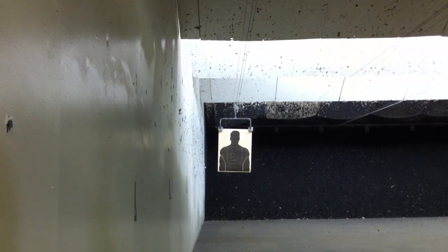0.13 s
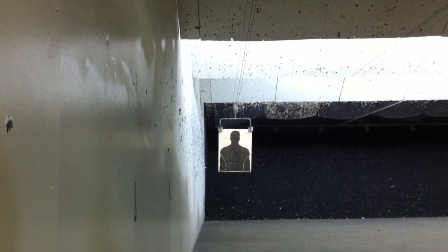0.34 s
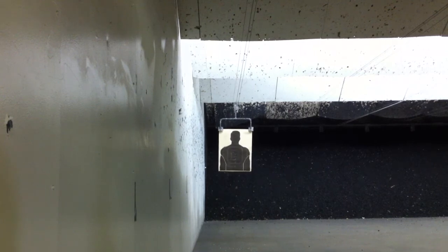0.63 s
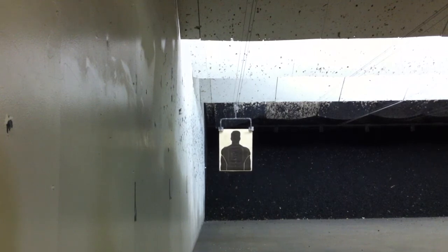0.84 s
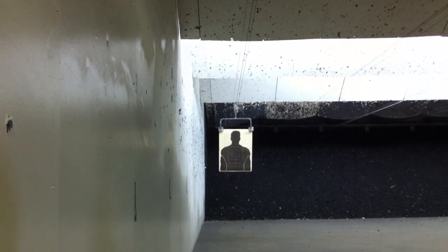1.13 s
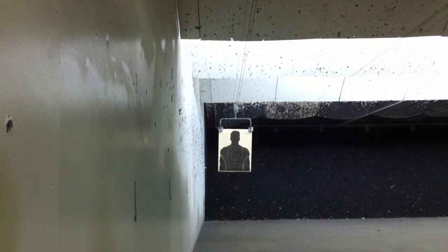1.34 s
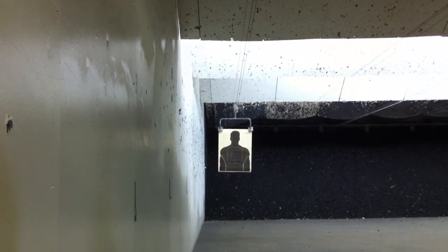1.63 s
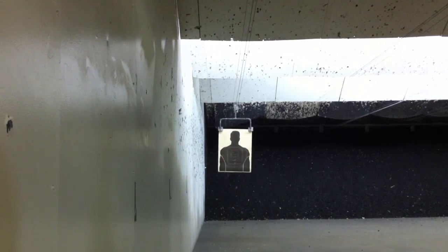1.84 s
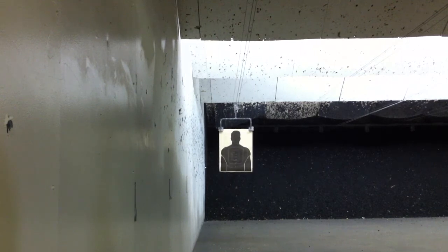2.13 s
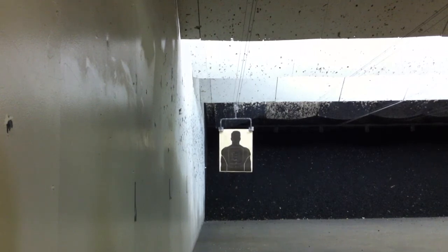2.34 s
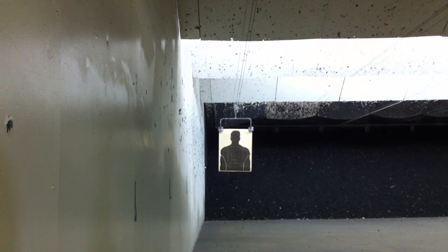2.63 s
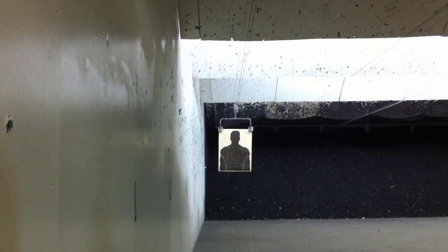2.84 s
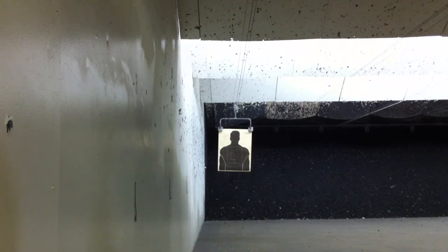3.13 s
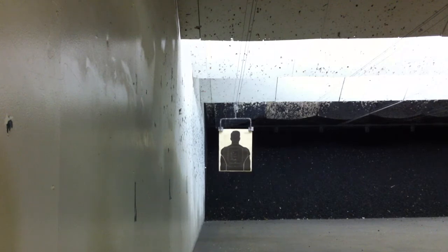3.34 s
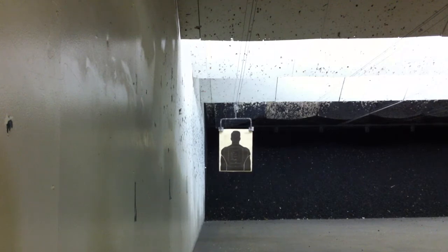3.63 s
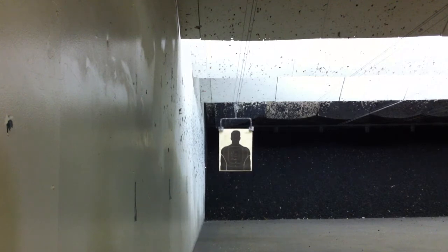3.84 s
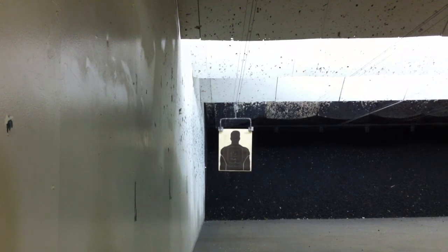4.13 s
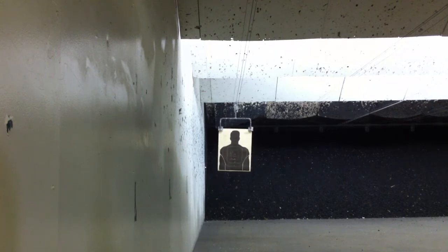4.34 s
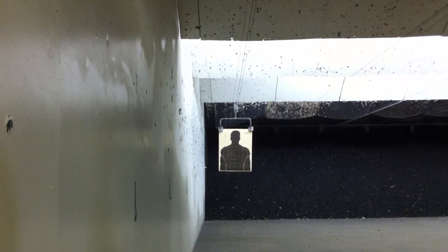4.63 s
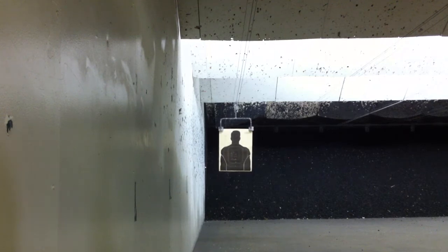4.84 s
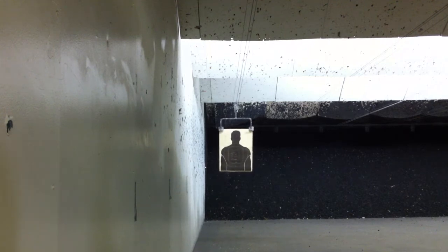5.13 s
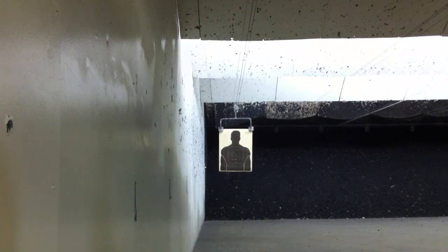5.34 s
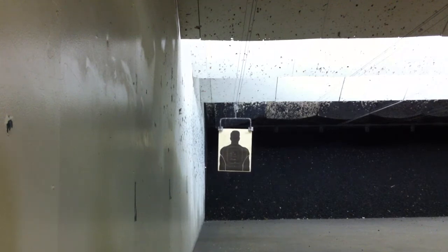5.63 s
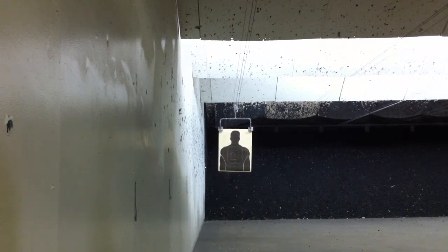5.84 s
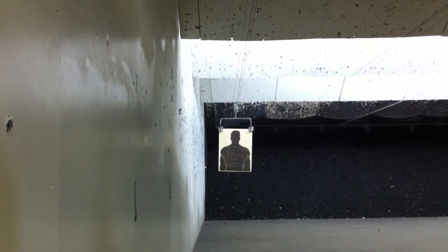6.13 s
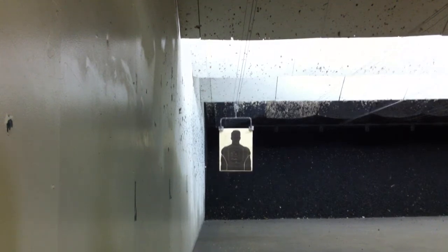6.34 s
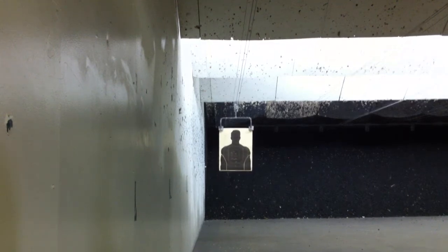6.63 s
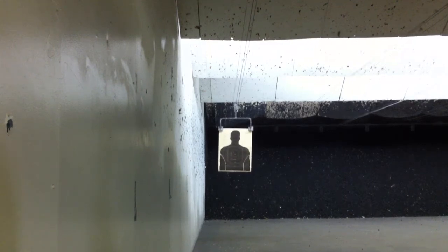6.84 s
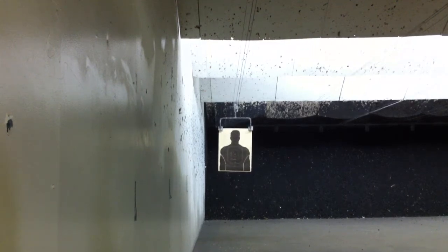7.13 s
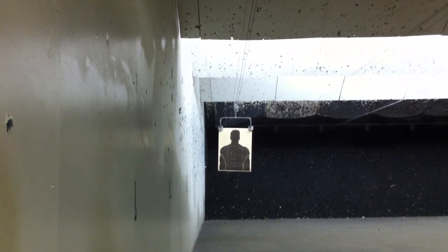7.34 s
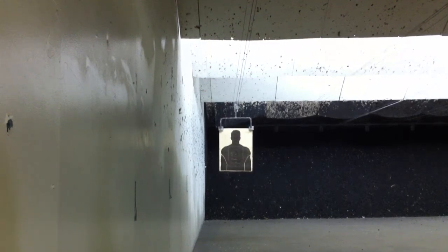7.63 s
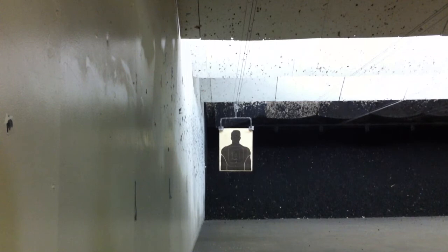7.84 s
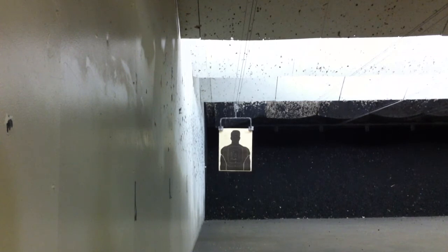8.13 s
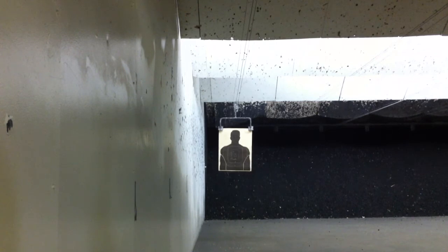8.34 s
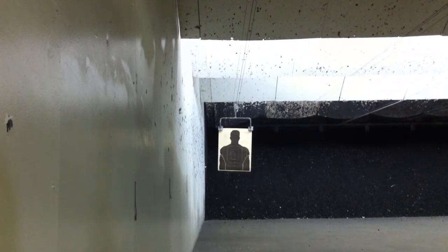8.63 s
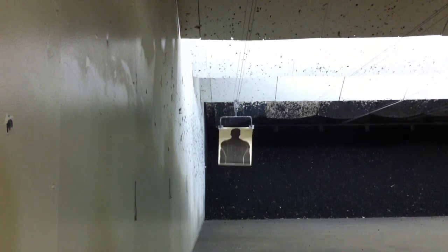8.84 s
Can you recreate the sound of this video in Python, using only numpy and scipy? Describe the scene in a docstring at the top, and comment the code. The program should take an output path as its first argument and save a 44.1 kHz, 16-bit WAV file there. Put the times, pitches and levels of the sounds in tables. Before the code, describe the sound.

A concrete indoor shooting range is heard from the shooter's booth, with a faint ventilation hum throughout. The echo of an earlier shot is dying away at the start. Three very loud pistol shots come at about 0.3, 2 and 3.8 seconds, each overloading the microphone and ringing down the long hall for about two seconds. Spent brass cases bounce and ping on the floor between and after the shots, with a sharp clack near 3.4 seconds, and roll with a thin high ring until about 7 seconds. A sleeve swishes softly around 3.5 and 5.5 seconds, and light ticks follow. From 6.3 to 6.8 seconds the pistol is put down on the bench with close knocks and a metal rattle. A dull thud sounds far off at 7.9 seconds. At 8.6 seconds a switch clicks and the target carrier motor starts with a growing whirr.

```python
"""A concrete indoor range, the microphone in the shooter's booth. Slow pistol shots overload it and
ring down the long hall. Spent brass cases bounce, ring and roll on the floor. Close by, a sleeve swishes
and light ticks sound; the pistol is put down on the bench with a knock and a metal rattle. Something
thuds far off, and a switch starts the motor of the target carrier. Ventilation hums throughout."""
import sys
import numpy as np
from scipy import signal
from scipy.fft import rfft, irfft, next_fast_len
from scipy.io import wavfile

SR = 44100
rng = np.random.default_rng(int(sys.argv[2]) if len(sys.argv) > 2 else 0)


def transcribe(u):
    """Save the signal u as a 16-bit wav file named by the first command-line argument.

    u: samples, shape (n,) or (channels, n), limited to [-1, 1]; the rate is SR.
    q: integer samples, one column per channel.
    """
    v = np.clip(np.atleast_2d(u).T, -1, 1)
    q = np.round(v * 32767).astype(np.int16)
    wavfile.write(sys.argv[1], SR, q)


N = 396892

# The shots, the first already dying away. Each row: start in seconds, level in dB, extra crack in dB.
SHOTS = [(-1.45, 0.0, 0.0), (0.2882, 0.0, 1.5), (2.0148, 0.5, -0.7), (3.7605, 0.9, 1.0)]
# The hall's diffuse answer to a shot. Each row: frequency in Hz, level in dB per Hz, t60 in seconds.
HALL_BANDS = [(50, -32, .5), (125, -17.5, 0.85), (234, -2, 1.56), (490, 8, 1.985), (815, 13.5, 1.99),
              (1150, 9, 1.72), (1600, 6, 1.585), (2073, -0.5, 1.77), (2520, 2, 1.98), (2625, 4.5, 1.72),
              (3190, 0, 1.4), (6000, -3.5, 0.87), (9450, -2.5, 0.48), (12000, -1.5, 0.42),
              (16000, 2.5, 0.37)]


def from_db(db):
    """Decibels as an amplitude factor."""
    return 10 ** (np.asarray(db) / 20)


def rms_one(x):
    """The signal scaled to rms 1."""
    return x / np.sqrt(np.mean(x ** 2) + 1e-20)


def clock(size):
    """Sample times in seconds."""
    return np.arange(size) / SR


def log_bins(size):
    """Log frequency of each FFT bin."""
    return np.log(np.fft.rfftfreq(size, 1 / SR) + 1)


def steady_noise(spectrum):
    """Noise coloured by (Hz, dB) rows; rms 1."""
    hz, db = np.transpose(spectrum)
    size = next_fast_len(N, True)
    colour = from_db(np.interp(log_bins(size), np.log(hz), db))
    return rms_one(irfft(rfft(rng.standard_normal(size)) * colour, size)[:N])


def dying_noise(bands, size):
    """A burst of noise in overlapping bands, each with its own level and decay."""
    hz, db, t60 = np.transpose(bands)
    bins, t = log_bins(size), clock(size)
    coloured = rfft(rng.standard_normal(size)) * from_db(np.interp(bins, np.log(hz), db))
    shares = [np.interp(bins, np.log(hz), one) for one in np.eye(len(hz))]
    return sum(irfft(coloured * share, size) * from_db(-60 * t / life)
               for share, life in zip(shares, t60))


def ringing(modes, size, spread_db=0):
    """Decaying sines of random phase that swell within their first cycle."""
    t = clock(size)
    out = np.zeros(size)
    for hz, db, t60 in modes:
        strength = from_db(db + spread_db * rng.normal())
        envelope = from_db(-60 * t / t60) * (1 - np.exp(-2 * hz * t))
        out += strength * envelope * np.sin(2 * np.pi * (hz * t + rng.random()))
    return out


def singing(hz, width_hz):
    """Noise through one resonance; rms 1."""
    radius = np.exp(-np.pi * width_hz / SR)
    feedback = [1, -2 * radius * np.cos(2 * np.pi * hz / SR), radius * radius]
    return rms_one(signal.lfilter([1, 0, -1], feedback, rng.standard_normal(N)))


def add(out, s, sound):
    """Mixes in a sound that starts at time s, even if that lies before zero."""
    i = round(s * SR)
    part = sound[max(-i, 0):N - i]
    out[max(i, 0):max(i, 0) + len(part)] += part


def swell(start, end):
    """A smooth arch from start to end."""
    progress = np.clip((clock(N) - start) / max(end - start, .01), 0, 1)
    return np.sin(np.pi * progress).clip(0)


def hits(events, bands, size):
    """One fresh noise burst for each (s, dB) row."""
    out = np.zeros(N)
    for s, db in events:
        add(out, s, from_db(db) * dying_noise(bands, size))
    return out


def strikes(events, modes, size, spread_db=2.5):
    """Each (s, dB) row rings the same modes a little differently."""
    out = np.zeros(N)
    for s, db in events:
        add(out, s, from_db(db) * ringing(modes, size, spread_db))
    return out


def pistol_shots(build_s=.035, flutter_db=4.5, boom_db=-17.0, lead_s=0.002, lead_db=-24.0):
    """Gun and microphone stay put, so the hall answers every shot with the same pattern of echoes."""
    # Standing waves between the concrete walls, and the faint high ring of a flutter between them.
    # Each row: frequency in Hz, level in dB, t60 in seconds.
    wall_modes = [(443, -14.2, 1.7), (510, -12.2, 2.65), (585, -14.5, 1.93), (614, -18, 1.7),
                  (642, -15.6, 1.7), (654, -7.8, 1.8), (680, -18, 1.7), (696, -18, 1.7), (713, -15.1, 2.17),
                  (731, -15.6, 2.02), (764, -19, 1.88), (798, -17.0, 1.95), (824, -17.1, 1.74),
                  (843, -15.7, 1.7), (870, -14.0, 1.7), (922, -23.7, 2.35), (942, -16.3, 1.86),
                  (981, -15.5, 1.7), (1074, -19.7, 1.7), (1117, -17.4, 1.7), (1145, -21.4, 1.96),
                  (1164, -21.0, 1.8), (1185, -16.4, 1.7), (1211, -18.8, 1.7), (1231, -17.0, 1.7),
                  (1275, -22.6, 1.7)]
    flutter_modes = [(1473, -26, 1.7), (1537, -27, 1.7), (1734, -29, 1.7), (2336, -32, 2.1),
                     (2409, -32, 2.1), (2481, -28, 2.1), (2553, -29, 2.3), (2626, -25.5, 2.2),
                     (2697, -33, 1.9), (2770, -32, 2.1)]
    # Low boom while the hall is at its loudest. Each row: frequency in Hz, relative dB per Hz.
    boom_spectrum = [(30, -19.5), (85, -22), (145, 0), (250, 3), (380, 0), (700, -28), (3000, -71.5)]
    # Muzzle crack and its first reflections in the booth.
    # Each row: frequency in Hz, level in dB per Hz, t60 in seconds.
    crack_bands = [(100, -7.5, .15), (795, 9.5, 0.078), (2573, 6.5, 0.46), (6900, 3.5, .22),
                   (15000, 4, 0.11), (21200, 14.5, .16)]
    size = 131072
    diffuse = dying_noise(HALL_BANDS, size)
    modes = ringing(wall_modes, size) + from_db(flutter_db) * ringing(flutter_modes, size)
    hall = (diffuse + modes) * (1 - np.exp(-clock(size) / build_s))   # echoes pile up
    boom = from_db(boom_db) * steady_noise(boom_spectrum) * swell(start=0.022, end=0.33)
    crack = dying_noise(crack_bands, size=32768)
    gas = from_db(lead_db) * crack[:round(lead_s * SR)]   # escapes just ahead of the blast
    out = np.zeros(N)
    for s, db, crack_db in SHOTS:
        add(out, s, from_db(db) * (hall + boom[:size]))
        add(out, s, from_db(db + crack_db) * crack)
        add(out, s - lead_s, gas)
    return out


def ventilation(level_db=-50):
    """The room tone: a steady hum of moving air."""
    # Each row: frequency in Hz, relative dB per Hz.
    air_spectrum = [(18, -66.5), (30, -46), (120, -17), (160, -2), (230, -21.5), (284, -10.5), (399, -17),
                    (492, -15.5), (639, -15.5), (897, -22.5), (1260, -26), (1400, -28.5), (1870, -29.5),
                    (6370, -44.5), (13000, -47), (15500, -50)]
    return from_db(level_db) * steady_noise(air_spectrum)


def bouncing_cases(tumble_s=0.024, slap_db=-1.5, spread_hz=60.0, ring_t60=0.28, ring_db=-3.5):
    """Each bounce clicks, pings and rings the brass; the harder it lands, the wider its ring splits."""
    # Bounces on the floor. Each row: start in seconds, then click, ping and ring levels in dB.
    bounces = [(0.046, -50.5, -35, -40.5), (0.216, -55, -35, -55), (1.03, -24.5, -31, -38),
               (1.606, -36, -28, -35), (1.728, -46, -32, -38.5), (1.983, -40, -41, -56.5),
               (2.890, -49, -32, -51.5), (3.248, -50, -26.5, -60.5), (3.35, -38.5, -31, -45.5),
               (4.531, -30.5, -20, -61), (4.688, -44, -23.5, -59), (5.016, -49.5, -33, -69),
               (5.168, -54, -35.5, -56)]
    # The click of brass on concrete, and its short ping.
    # Each row: frequency in Hz, level in dB per Hz, t60 in seconds.
    click_bands = [(1000, -18.5, .04), (2980, 2, 0.08), (4500, 1, 0.099), (8000, -2.5, 0.082),
                   (15000, -4, .14)]
    ping_bands = [(3300, -22.5, .04), (4720, -4.5, .05), (5250, -0.5, .06), (5825, -4.5, .05),
                  (7124, -25, .03)]
    # Every shot throws out a new case. Each entry: its pitch in Hz.
    case_hz = [10920, 10870, 11250, 10900]
    clicks = [(s, db) for s, db, _, _ in bounces]
    slaps = [(s + tumble_s, db + slap_db) for s, db in clicks]   # the other end comes down
    pings = [(s, db) for s, _, db, _ in bounces]
    out = hits(clicks + slaps, click_bands, size=8192) + hits(pings, ping_bands, size=4096)
    usual_db = np.mean([db for _, db in clicks])
    for s, click_db, _, db in bounces:
        latest_shot = sum(shot[0] < s for shot in SHOTS) - 1
        split_hz = spread_hz * from_db(.4 * (click_db - usual_db))
        pitches = case_hz[latest_shot] + split_hz * rng.standard_normal(5)
        add(out, s, from_db(ring_db) * ringing([(hz, db, ring_t60) for hz in pitches], size=22050))
    return out


def rolls_and_lingering_ping(last_db=1.5, last_width_hz=9.5):
    """Floor grit keeps rolling cases singing; one bounce's ping lingers in the hall as a broad hiss."""
    # The narrow bands are rolls; the wide one at 4350 Hz is the lingering ping.
    # Each row: start and end in seconds, centre and width in Hz, level in dB.
    bands = [(0.07, 0.278, 10970, 30, -58), (1.6, 1.94, 4350, 450, -55.5), (2.4, 2.8, 10730, 33, -68),
             (3.367, 3.753, 11400, 50, -54.5), (4.3, 4.994, 10620, 34, -63),
             (4.845, 5.466, 6500, 23, -60.5), (5.21, 5.4, 7900, 30, -59), (5.27, 5.41, 10800, 25, -53)]
    # The last case rolls on for a long while. Each row: time in seconds, level in dB.
    last_roll = [(5.6, -67), (5.644, -76), (5.704, -64), (6.25, -68.5), (6.318, -65), (6.372, -60),
                 (6.422, -42), (6.886, -81), (7.1, -91)]
    # Its modes. Each row: frequency in Hz, level in dB.
    last_modes = [(7795, -0.5), (11850, -12)]
    short = sum(from_db(db) * np.sqrt(swell(start, end)) * singing(hz, width_hz)
                for start, end, hz, width_hz, db in bands)
    times, level_db = np.transpose(last_roll)
    level = from_db(last_db + np.interp(clock(N), times, level_db, left=-np.inf, right=-np.inf))
    return short + level * sum(from_db(db) * singing(hz, last_width_hz) for hz, db in last_modes)


def sleeve():
    """Cloth slides softly as the shooter moves."""
    # Each row: start and end in seconds, level in dB.
    swishes = [(3.16, 3.835, -50), (4.805, 5.613, -61), (5.35, 5.765, -50.5), (7.485, 7.66, -64.5)]
    # Each row: frequency in Hz, relative dB per Hz.
    cloth_spectrum = [(800, -6), (3000, 8), (7000, 2.5), (15000, -3.5)]
    movement = sum(from_db(db) * swell(start, end) ** 2 for start, end, db in swishes)
    return steady_noise(cloth_spectrum) * movement


def clack_and_ticks():
    """A sharp clack and its rebound as a case lands, then light ticks."""
    # Each row: start in seconds, level in dB.
    contacts = [(3.353, -26.5), (3.404, -36.5), (5.741, -42.5), (5.774, -50), (5.893, -51.5), (6.105, -43),
                (7.753, -48), (8.338, -55)]
    # Their noise and brief ring. Each row: frequency in Hz, level in dB (bands: per Hz), t60 in seconds.
    contact_bands = [(500, -11, .06), (1400, 0, .07), (3000, 3, 0.084), (5540, -4, 0.037),
                     (14400, -20.5, .02)]
    ring_modes = [(2220, -8, 0.046), (2600, -5.5, .04), (2870, -2.5, .04), (4600, -10, .03)]
    return hits(contacts, contact_bands, size=4096) + strikes(contacts, ring_modes, size=4096)


def bench_knocks(settle_s=.011, touch_db=-5, rebound_db=-7.5, wood_db=3.5):
    """Pistol and hand meet the bench: a touch, the full weight that rings the top, and a rebound."""
    # Each row: start in seconds, level in dB.
    knocks = [(6.3094, -16.5), (6.456, -21.5), (6.555, -36.5)]
    # The contact and the top. Each row: frequency in Hz, level in dB (bands: per Hz), t60 in seconds.
    contact_bands = [(40, -16, .08), (110, -9, .08), (297, 16.5, 0.15), (890, 7.5, 0.088),
                     (1750, -0.5, 0.076), (4740, -3, 0.17), (15000, -25, 0.051)]
    top_modes = [(162, -10.5, 0.204), (246, 5, 0.068), (458, 0.5, 0.037), (838, -18, 0.096)]
    blows = [(s + k * settle_s, db + step_db)
             for s, db in knocks for k, step_db in enumerate((touch_db, 0, rebound_db))]
    weights = [(s + settle_s, db) for s, db in knocks]
    contact = hits(blows, contact_bands, size=8192)
    return contact + from_db(wood_db) * strikes(weights, top_modes, size=8192, spread_db=3.0)


def metal_rattle(fade_db_per_s=81, uneven_db=1, ring_db=-7.0, click_db=-8.0):
    """Loose metal chatters on the bench in evenly spaced touches that weaken through each run."""
    # Each row: start and length in seconds, first touch in dB, seconds between touches.
    runs = [(6.3117, .145, -17, .0108), (6.465, .028, -28, .0108), (6.589, .015, -35, 0.013),
            (6.612, .039, -24.5, .011), (6.666, .028, -28.5, .0112), (6.71, .03, -32.5, .0225),
            (6.787, .005, -44, .011)]
    # The metal and its contact. Each row: frequency in Hz, level in dB (bands: per Hz), t60 in seconds.
    metal_modes = [(1968, -16, 0.11), (2460, -10, 0.062), (2930, -10.5, 0.073), (3390, -9.5, 0.11),
                   (4000, -16, 0.12), (4490, -3.5, 0.025), (4980, -2.5, 0.03), (5140, -18, 0.046),
                   (6300, -20, .05), (6600, -7.5, 0.035), (7100, -8, 0.038), (9000, -13, 0.047),
                   (12300, -13, 0.04), (14300, -7, 0.033)]
    contact_bands = [(2000, -7, 0.023), (4850, 4, 0.051), (15000, -8, 0.041)]
    touches = [(start + t, db - fade_db_per_s * t + uneven_db * rng.normal())
               for start, length, db, gap in runs for t in np.arange(0, length, gap)]
    ring = from_db(ring_db) * strikes(touches, metal_modes, size=12000, spread_db=3.0)
    return ring + from_db(click_db) * hits(touches, contact_bands, size=2048)


def far_thud(treble_hz=3500.0):
    """A dull blow far down the hall; distance takes away its treble."""
    # Each row: start in seconds, level in dB.
    blows = [(7.893, -39.5), (7.918, -53)]
    # Its noise and low ring. Each row: frequency in Hz, level in dB (bands: per Hz), t60 in seconds.
    thud_bands = [(60.2, -5, 0.28), (169.6, 21, 0.39), (334, 18.5, 1), (990, 13, 0.76), (2500, 2.5, 0.99),
                  (5000, -5, 0.88), (12050, -32, 0.45)]
    thud_modes = [(299, 9, 0.32), (385, 4, 0.21), (450, -9, 0.23)]
    thud = hits(blows, thud_bands, size=32768) + strikes(blows, thud_modes, size=16384)
    return signal.sosfilt(signal.butter(1, treble_hz, fs=SR, output="sos"), thud)


def carrier_switch():
    """The target carrier's switch in the booth closes with a double click."""
    # Each row: start in seconds, level in dB.
    clicks = [(8.6225, -31.5), (8.643, -40.5)]
    # Each row: frequency in Hz, level in dB per Hz, t60 in seconds.
    click_bands = [(40, -8, .08), (151, 8, .1), (600, 7, 0.27), (2000, 5, 0.072), (7100, -0.5, 0.072),
                   (15000, -3, .04)]
    return hits(clicks, click_bands, size=8192)


def carrier_motor(start_s=8.644, spin_up_s=0.031, rumble_db_per_s=9, whirr_db_per_s=37, jerk_db=1.2):
    """The motor comes up quickly; rumble and whirr grow as the cable gathers speed over its pulleys."""
    # Each row: frequency in Hz, relative dB per Hz.
    rumble_spectrum = [(47, -51), (80, -17), (173, 5.5), (366, -14), (404, -0.5), (474, -27), (529, 5.5),
                       (636, -8), (755, -2), (1500, -10.5), (1950, -43), (3300, -120)]
    whirr_spectrum = [(880, -34), (1500, -9.5), (2490, -3.5), (3380, -8), (3650, -13), (4310, -15),
                      (4750, -15), (7900, -22.5), (13400, -25.5), (15500, -25)]
    # The cable jerks unevenly. Each row: swings a second, relative level in dB.
    jerk_spectrum = [(8, 0), (25, -2), (90, -30), (400, -80)]
    t = np.maximum(clock(N) - start_s, 0)
    rumble = from_db(-41.5 + rumble_db_per_s * t) * steady_noise(rumble_spectrum)
    whirr_db = -49 + whirr_db_per_s * t + jerk_db * steady_noise(jerk_spectrum)
    whirr = from_db(whirr_db) * steady_noise(whirr_spectrum)
    return (1 - np.exp(-t / spin_up_s)) * (rumble + whirr)


def hall_echo(x):
    """Small sounds die away in the same hall as the shots; the tail has unit energy."""
    tail = dying_noise([(hz, 0, t60) for hz, _, t60 in HALL_BANDS], size=65536)
    return signal.fftconvolve(x, tail / np.linalg.norm(tail))[:N]


def scene(floor_wet_db=-2.5, near_wet_db=-22.5):
    """Things near the microphone reach it almost dry; the bouncing cases get more of the hall."""
    floor = bouncing_cases()
    near = clack_and_ticks() + bench_knocks() + metal_rattle() + carrier_switch()
    echo = hall_echo(from_db(floor_wet_db) * floor + from_db(near_wet_db) * near)
    far = rolls_and_lingering_ping() + far_thud() + carrier_motor() + ventilation()
    return (pistol_shots() + floor + near + echo + far + sleeve())[None]


def record(dry, ceiling=0.62, knee=24.0, low_cut_hz=93.0, treble_hz=10600.0, cutoff_hz=15900):
    """The microphone's input stage flattens the blasts; then the deepest bass and the top are cut."""
    oversampled = signal.resample_poly(dry, 2, 1, axis=-1)
    clipped = oversampled / (1 + np.abs(oversampled / ceiling) ** knee) ** (1 / knee)
    flattened = signal.resample_poly(clipped, 1, 2, axis=-1)
    gentle_band = signal.butter(1, [low_cut_hz, treble_hz], "band", fs=SR, output="sos")
    steep_top = signal.ellip(14, .1, 90, cutoff_hz, fs=SR, output="sos")
    return signal.sosfilt(steep_top, signal.sosfilt(gentle_band, flattened))


dry = scene()
out = record(dry)
transcribe(out)
```